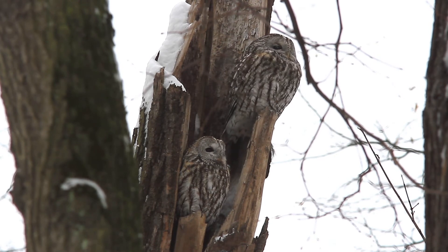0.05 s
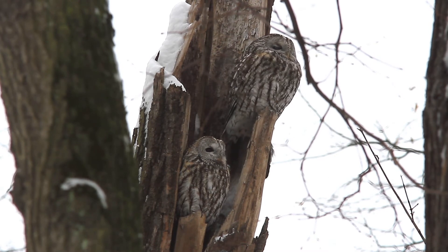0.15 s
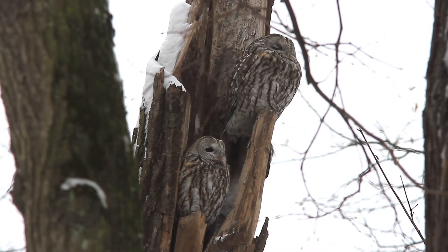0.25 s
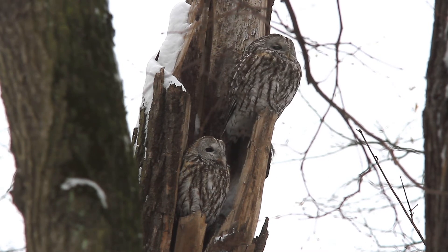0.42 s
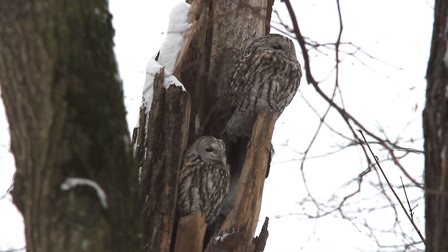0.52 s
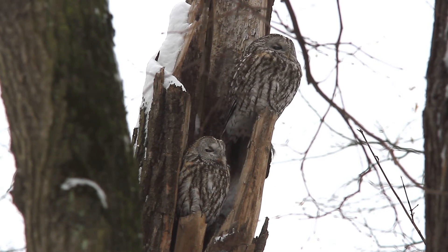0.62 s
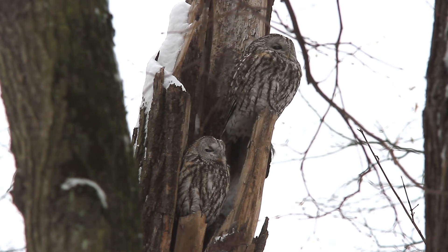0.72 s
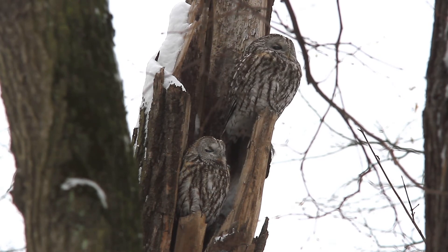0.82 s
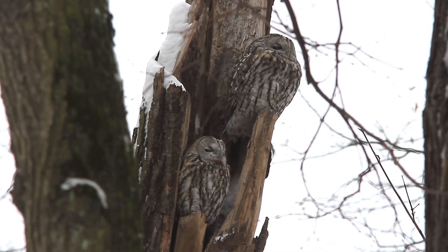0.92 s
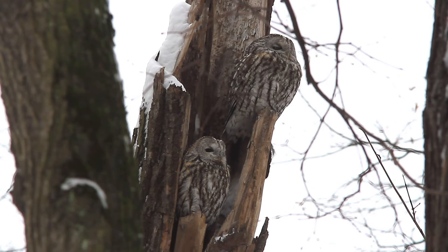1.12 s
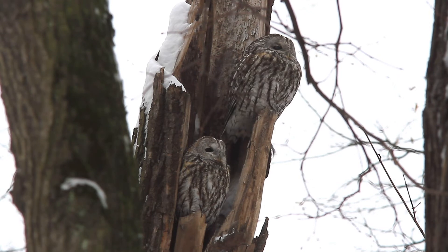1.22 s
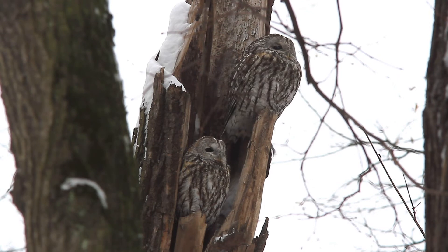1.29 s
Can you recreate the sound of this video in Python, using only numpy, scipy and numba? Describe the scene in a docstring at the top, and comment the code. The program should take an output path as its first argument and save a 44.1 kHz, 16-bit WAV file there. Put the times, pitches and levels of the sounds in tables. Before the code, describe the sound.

In quiet open woodland, a small bird whistles thinly, then a louder bird gives one short, rasping screech. Its tail scatters off trunks, with barely audible chips afterwards and soft far traffic, picked up in mono.

```python
"""Harsh screech of a jay-like bird in a wood

A jay-like bird gives one screech, just after a small bird's thin whistles; faint chips follow.
The screech is a source-filter voice: a rattle of pulses that breaks into a rough rasp, shaped by
the resonances of throat and beak. The whistles and chips are gliding sines. Trunks scatter the calls
into a long tail, over the filtered noise of far traffic and the harmonic hum of a distant engine."""
import sys
import numpy as np
from scipy import signal
from scipy.fft import rfft, irfft, next_fast_len
from scipy.io import wavfile
from scipy.ndimage import uniform_filter1d
from numba import njit

SR = 44100
rng = np.random.default_rng(int(sys.argv[2]) if len(sys.argv) > 2 else 0)


def master_out(mix):
    """Clip the mix to full scale and print it as 16-bit PCM to the path in sys.argv[1]."""
    frames = np.transpose(np.atleast_2d(mix))
    ceiling = np.clip(frames, -1, 1)
    pcm = np.round(ceiling * 32767).astype(np.int16)
    wavfile.write(sys.argv[1], SR, pcm)


N = 59535

# Loudness of the screech: time_s, level_db
SCREECH_LEVEL = [(.405, -72), (.416, -49), (.428, -41), (.452, -34), (.5, -34), (.59, -34), (.66, -34.5),
                 (.745, -35), (.772, -44.5), (.8, -62)]
# Vibration of the voice: time_s, pulse_rate_hz, roughness (0-1), main_resonance_hz
VOICE_MOTION = [(.41, 205.4, 0.06, 3060), (.45, 192.1, 0.02, 3200), (.485, 183.1, .35, 3335),
                (.54, 177.5, .95, 3420), (.733, 172.7, .95, 3410), (.757, 160.4, .8, 3100)]
# Beak opening, heard in the treble: time_s, treble_gain_db
BEAK_OPENING = [(.41, -27), (.45, -8.5), (.52, 1), (.6, -1), (.68, -3), (.78, 0)]
# Fixed resonances of throat and beak: centre_hz, width_hz, gain_db
THROAT_RESONANCES = [(1190, 70, -7), (1370, 70, -8), (1600, 260, -6.5), (1920, 220, -4), (2250, 300, -7),
                     (2620, 400, -6), (3200, 650, 1.5), (3660, 200, -4), (4030, 280, -2.5), (4420, 450, .5),
                     (4950, 550, -4), (6050, 850, -6.5), (7450, 1100, -12), (9500, 1050, -14.5),
                     (12100, 1200, -21), (13800, 1700, -26.5)]
# Lower throat resonance, strongest as the call opens and closes: time_s, centre_hz, boost_db
LOW_RESONANCE = [(.415, 1520, 13), (.44, 1520, -12), (.48, 1580, -6), (.54, 1520, -3), (.68, 1810, -36),
                 (.745, 1826, -0.5), (.78, 1890, -9)]
# Clear overtone of the pulse rate as the call opens: time_s, level_db
OPENING_OVERTONE = [(.405, -61), (.418, -62), (.44, -52), (.485, -56), (.52, -53)]
# Shrill tone locked onto the main resonance: time_s, level_db (relative to the filtered voice)
SHRILL_TONE = [(.5, -48), (.57, -15), (.68, -12), (.715, -11.5), (.755, -10), (.775, -24)]
# Thin whistles: start_s, length_s, start_hz, settled_hz, glide_s, level_db, swell_exponent, flutter_db
THIN_WHISTLES = [(-.11, 0.1, 3750, 3720, .02, -49.5, 0.74, -5),
                 (0.148, 0.092, 5400, 5100, 0.024, -49.5, 1, 0.9),
                 (.3245, 0.088, 5760, 3787, 0.0021, -53, 0.42, 2.2)]
# Faint falling chips from further off: start_s, length_s, start_hz, end_hz, level_db
FALLING_CHIPS = [(1.183, .035, 7400, 5940, -73), (1.297, .033, 6750, 6300, -73),
                 (1.338, 0.015, 6300, 5080, -74)]
# Decay of the wood's reverberation: frequency_hz, t60_s
WOOD_DECAY = [(1000, 1.97), (3300, 1.184), (6000, 0.37), (12000, 1.24)]
# Spectral shape of the far murmur: frequency_hz, relative_level_db
MURMUR_SPECTRUM = [(25, -21), (60, -11.5), (100, -9.5), (140, -1), (280, -1.5), (480, -1), (700, -4.5),
                   (1000, -8.5), (1500, -21), (2300, -30), (4000, -31.5), (8000, -35), (15500, -39.5)]
# Loudness of the engine's fundamental: time_s, level_db
ENGINE_LEVEL = [(0, -53), (.12, -56), (.27, -48), (.42, -49), (.6, -51), (.8, -56.5), (1.05, -54),
                (1.2, -58.5), (1.3, -54)]
# Upper harmonics of the engine: multiple, level_db
ENGINE_HARMONICS = [(2, -56), (3, -61), (4, -66)]

# Screech source: one pulse is centred at PULSE_AT_S; noise levels are relative to the pulses
PULSE_AT_S = .4232
JITTER, SHIMMER_DB = .15, 1.5  # scatter of log rate and of level at full roughness
PUFF_DECAY_CYCLES, PUFF_DB, RASP_DB = 0.29, -2.5, 5
SECOND_HZ, SECOND_JITTER, SECOND_DB = 587.7, 0.0206, -2.5
SCATTER_S, SCATTER_SHARE = (0.000317, 0.000514, .00083), 0.46  # quick bounces that smear each pulse
# Screech filters and tones
THROAT_LOW_HZ, BEAK_HZ = 990, 6450  # bass and treble corners
MAIN_WIDTH_HZ, MAIN_DB, LOW_WIDTH_HZ = 370, 0, 280
OVERTONE_MULTIPLE = 8
SHRILL_WAVER, SHRILL_FLUTTER_DB = 0.0172, -4.5
# Wood: levels of tail and trunk returns, and the whistles' and chips' share of the tail
WOOD_DB, TRUNKS_DB, WHISTLE_WET_DB = -10.5, -4, -7
TRUNKS_DECAY_S, FIRST_RETURN_S, TAIL_BUILD_S = 0.04, .012, 0.013
# Background and upper limit of the sound
MURMUR_DB, ENGINE_HZ, TOP_HZ = -48, 165.4, 15700


def screech():
    """Source-filter principle: pulses, air puffs and a growing rasp excite the throat's resonances."""
    rough = curve(VOICE_MOTION, column=2)
    main_hz = curve(VOICE_MOTION, column=3)

    # Roughness scatters the pulses and brings in a second voice and noise
    pulse_hz = curve(VOICE_MOTION) * np.exp(JITTER * rough * walk(200))
    beat, phase = pulses(pulse_hz, PULSE_AT_S)
    second, _ = pulses(SECOND_HZ * np.exp(SECOND_JITTER * walk(500)), PULSE_AT_S)
    puffs = unit(np.exp(-phase / PUFF_DECAY_CYCLES) * rng.standard_normal(N))
    rasp = undb(RASP_DB) * rng.standard_normal(N) + undb(SECOND_DB) * second
    source = smear(beat) + undb(PUFF_DB) * puffs + rough * rasp
    source *= undb(SHIMMER_DB * rough * walk(350))
    # Hold the power steady as the rasp joins
    rasp_power = undb(RASP_DB) ** 2 + undb(SECOND_DB) ** 2
    source /= np.sqrt(1 + undb(PUFF_DB) ** 2 + rough ** 2 * rasp_power)

    voice = unit(colour(source, throat_gain))
    main = undb(MAIN_DB) * rough * resonate(voice, main_hz, float(MAIN_WIDTH_HZ))
    low_boost = undb(curve(LOW_RESONANCE, column=2))
    low = low_boost * resonate(voice, curve(LOW_RESONANCE), float(LOW_WIDTH_HZ))
    high_pass = signal.butter(2, BEAK_HZ, "high", fs=SR, output="sos")
    treble = signal.sosfiltfilt(high_pass, voice)
    beak_change = (undb(curve(BEAK_OPENING)) - 1) * treble

    shrill = sine(main_hz * (1 + SHRILL_WAVER * walk(250)))
    shrill *= swell_of(SHRILL_TONE) * undb(SHRILL_FLUTTER_DB * walk(400))
    overtone = swell_of(OPENING_OVERTONE) * np.sin(2 * np.pi * OVERTONE_MULTIPLE * phase)
    voice = voice + main + low + beak_change + np.sqrt(2) * shrill
    return voice * swell_of(SCREECH_LEVEL) + np.sqrt(2) * overtone


def pulses(hz, at_s):
    """Periodic excitation: one band-limited pulse a cycle, one of them at at_s, and the cycle's phase."""
    turns = np.cumsum(hz) / SR
    turns -= np.interp(at_s * SR, np.arange(N), turns)
    offset = (turns - np.round(turns)) * SR / hz  # samples from the nearest pulse
    train = np.sinc(offset) * np.exp(-(offset / 6) ** 2)
    return unit(train), turns % 1


def smear(x):
    """All-pass dispersion: quick bounces spread each pulse in time without colouring it."""
    hz = np.arange(N + 1) * SR / (2 * N)
    spectrum = rfft(x, 2 * N)
    for lag in SCATTER_S:
        late = np.exp(-2j * np.pi * hz * lag)
        spectrum = spectrum * (late - SCATTER_SHARE) / (1 - SCATTER_SHARE * late)
    return irfft(spectrum)[:N]


def throat_gain(hz):
    """Formant principle: the powers of the throat and beak resonances add, and the bass falls steeply."""
    power = 0
    for centre, width, db in THROAT_RESONANCES:
        power = power + undb(db) ** 2 / (1 + ((hz - centre) / width) ** 2 * 2) ** 2
    return np.sqrt(power / (1 + (THROAT_LOW_HZ / (hz + 1)) ** 4))


@njit
def resonate(x, hz, width):
    """Resonance: a state-variable band-pass with a moving centre and gain 1 there."""
    y, band, low = np.empty(len(x)), 0., 0.
    for i in range(len(x)):
        g, damping = np.tan(np.pi * hz[i] / SR), width / hz[i]
        v = (band + g * (x[i] - low)) / (1 + g * (g + damping))
        band, low, y[i] = 2 * v - band, low + 2 * g * v, damping * v
    return y


def small_birds(t):
    """Frequency modulation: sines glide onto a held, fluttering note, or fall as short chips."""
    out = np.zeros(len(t))
    quiver, flutter = np.resize(walk(150), len(t)), np.resize(walk(900), len(t))
    for start, length, from_hz, to_hz, glide, db, swell, flutter_db in THIN_WHISTLES:
        age = np.clip(t - start, 0, length)
        hz = to_hz + (from_hz - to_hz) * np.exp(-age / glide)
        hz *= 1 + 0.0012 * quiver
        shape = np.abs(np.sin(np.pi * age / length)) ** swell * (age < length)
        out += undb(db + flutter_db * flutter) * shape * sine(hz)
    for start, length, from_hz, to_hz, db in FALLING_CHIPS:
        part = np.clip((t - start) / length, 0, 1)
        hz = from_hz + (to_hz - from_hz) * part ** 2
        out += undb(db) * np.sin(np.pi * part) * sine(hz)
    return np.sqrt(2) * out


def wood():
    """Multiple scattering: sparse trunk returns, and a diffuse tail with a decay time for each band."""
    t = np.arange(N) / SR
    noise = rfft(rng.standard_normal(N))
    hz = np.arange(N // 2 + 1) * SR / N
    octave = np.clip(np.log2((hz + 1) / 1000), 0, 4)  # octaves above 1 kHz
    tail = 0
    for k in range(5):
        band = irfft(noise * np.maximum(1 - np.abs(octave - k), 0), N)
        t60 = at_hz(WOOD_DECAY, 1000 * 2 ** k)
        tail = tail + band * np.exp(-np.log(1000) * t / t60)
    tail = tail * (1 - np.exp(-(t / TAIL_BUILD_S) ** 2))

    trunks = rng.standard_normal(N) * (rng.random(N) < .012)
    trunks *= np.exp(-t / TRUNKS_DECAY_S) * (t > FIRST_RETURN_S)
    # Each response is scaled by its total energy
    return undb(TRUNKS_DB) * unit(trunks) / np.sqrt(N), undb(WOOD_DB) * unit(tail) / np.sqrt(N)


def traffic_murmur():
    """Filtered noise: far traffic is a broadband murmur, strongest in the bass and slowly varying."""
    murmur = colour(rng.standard_normal(N), lambda hz: undb(at_hz(MURMUR_SPECTRUM, hz)))
    return unit(murmur) * undb(MURMUR_DB + 0.57 * walk(3.8))


def engine_hum():
    """Harmonic series: a distant engine hums at a fundamental and its multiples, all wavering."""
    turn = 2 * np.pi * np.cumsum(ENGINE_HZ * (1 + 0.0023 * walk(10.8))) / SR
    hum = undb(curve(ENGINE_LEVEL) + 1.1 * walk(14.84)) * np.sin(turn)
    for multiple, db in ENGINE_HARMONICS:
        drift = 1.24 * walk(6.6)  # phase, radians
        hum = hum + undb(db + 0.73 * walk(11)) * np.sin(multiple * turn + drift)
    return np.sqrt(2) * hum


def undb(db):
    """Logarithmic level: decibels to amplitude gain."""
    return 10 ** (np.asarray(db) / 20)


def unit(x):
    """Normalisation: scale to rms 1."""
    return x / np.sqrt(np.mean(x ** 2) + 1e-20)


def sine(hz):
    """Phase is the running sum of frequency."""
    return np.sin(2 * np.pi * np.cumsum(hz) / SR)


def curve(table, column=1):
    """Linear interpolation of one table column in time."""
    rows = np.array(table, float)
    return np.interp(np.arange(N) / SR, rows[:, 0], rows[:, column])


def swell_of(table):
    """Amplitude envelope from a time_s, level_db table, silent outside it."""
    t = np.arange(N) / SR
    return undb(curve(table)) * (t > table[0][0]) * (t < table[-1][0])


def at_hz(table, hz):
    """Interpolation of a table on a log-frequency axis."""
    rows = np.array(table, float)
    return np.interp(np.log(hz + 1), np.log(rows[:, 0]), rows[:, 1])


def colour(x, gain_at):
    """Minimum-phase principle: the folded cepstrum turns a gain over frequency into a causal filter."""
    size = 2 * next_fast_len(len(x))
    hz = np.arange(size // 2 + 1) * SR / size
    cepstrum = irfft(np.log(gain_at(hz) + 1e-7))
    cepstrum[1:size // 2] *= 2
    cepstrum[size // 2 + 1:] = 0
    return irfft(rfft(x, size) * np.exp(rfft(cepstrum)))[:len(x)]


def walk(rate):
    """Smoothed random process: stepped noise, rate steps a second, averaged twice and set to rms 1."""
    hold = max(int(SR / rate), 1)
    steps = rng.standard_normal(N)[np.arange(N) // hold]
    return unit(uniform_filter1d(uniform_filter1d(steps, hold), hold))


def scene():
    """Superposition: the calls, convolved with the wood's response, add to the distant background."""
    lead = SR // 4  # the first whistle sounds before time zero; only its tail is heard
    trunks, tail = wood()
    call = screech()
    song = small_birds(np.arange(-lead, N) / SR)
    call = call + signal.fftconvolve(call, trunks + tail)[:N]
    song = song + undb(WHISTLE_WET_DB) * signal.fftconvolve(song, tail)[:N + lead]
    return (call + song[lead:] + traffic_murmur() + engine_hum())[None]


def record(dry):
    """Band limiting: a steep elliptic low-pass cuts the top of the range."""
    low_pass = signal.ellip(10, .2, 70, TOP_HZ, fs=SR, output="sos")
    return signal.sosfilt(low_pass, dry)


dry = scene()
out = record(dry)
master_out(out)
```